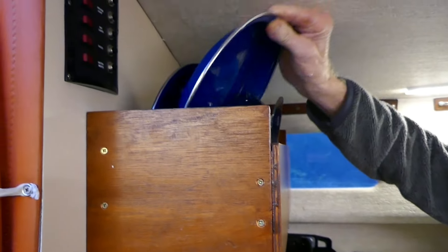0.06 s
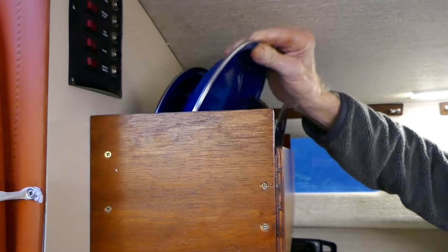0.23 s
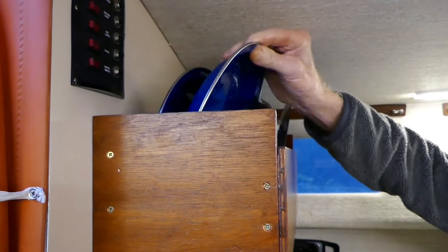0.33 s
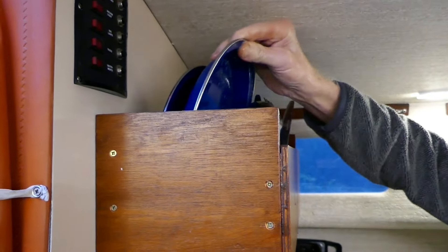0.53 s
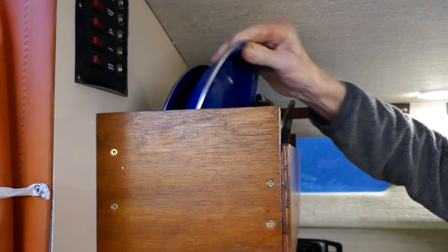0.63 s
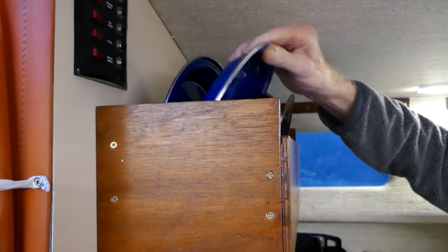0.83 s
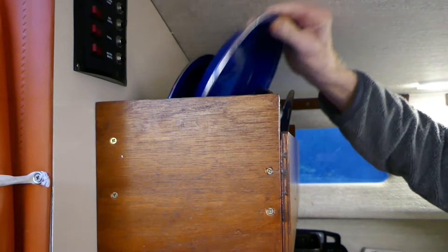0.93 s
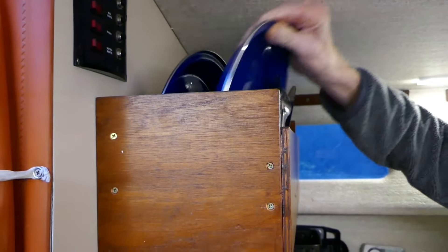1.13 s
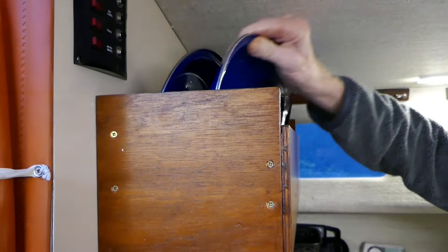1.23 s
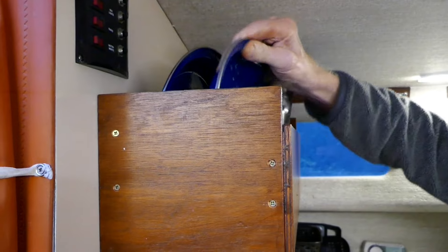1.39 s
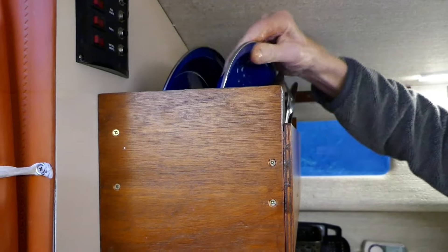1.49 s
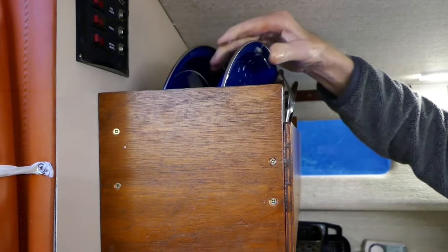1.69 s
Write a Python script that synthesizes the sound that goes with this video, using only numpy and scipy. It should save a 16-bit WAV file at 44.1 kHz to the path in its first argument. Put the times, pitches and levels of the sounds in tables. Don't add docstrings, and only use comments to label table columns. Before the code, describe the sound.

Enamel plates clatter into a wooden rack in a small boat cabin, heard close in stereo. Soft hush and a faint plate hum open; at 0.2 s rims clink and wood knocks. Lighter taps and rubs come around 0.5 and 0.8 s. A hard shove at 0.95 s rings brightly, then rattling continues with tiny cutlery tinkles at 1.1-1.3 s, final clinks near 1.5 s, settling by 1.7 s.

```python
import sys
import numpy as np
from scipy import signal
from scipy.io import wavfile

SR = 44100
rng = np.random.default_rng(int(sys.argv[2]) if len(sys.argv) > 2 else 0)


def gain_from_decibels(decibels):
    exponent = np.asarray(decibels, float) / 20
    return 10 ** exponent


def wav_out(sig):
    wavfile.write(sys.argv[1], SR, np.round(np.clip(np.atleast_2d(sig).T, -1, 1) * 32767).astype(np.int16))


N = 77175
TIME_S = np.arange(N) / SR
LEFT_RIGHT = np.array([[1], [-1]])


def rms_one(x):
    return x / np.sqrt(np.mean(x ** 2) + 1e-20)


def at_hz(points, hz):
    table_hz, values = np.transpose(points)
    return np.interp(np.log(hz), np.log(table_hz), values)


def cut(x, hz, kind):
    return signal.sosfilt(signal.butter(2, hz, kind, fs=SR, output="sos"), x)


def ring(clicks, hz, t60_s):
    decay = gain_from_decibels(-60 / (max(t60_s, 0.004) * SR))
    turn = 2 * np.pi * hz / SR
    return signal.lfilter([0, np.sin(turn)], [1, -2 * decay * np.cos(turn), decay ** 2], clicks + 1e-18)


def train(start_s, gains):
    clicks = np.zeros(N)
    clicks[(np.asarray(start_s) * SR).astype(int)] = gains
    return clicks


def grains(per_s, spread_db):
    chance, sign, size = rng.random((3, N))
    height = gain_from_decibels(spread_db * np.minimum(-np.log(size), 4))
    return rms_one((chance < per_s / SR) * np.sign(sign - 0.5) * height)


def burst(clicks, length_s):
    n = np.arange(int(0.008 * SR))
    shape = rng.standard_normal(len(n)) * np.exp(-n / (length_s * SR))
    return signal.lfilter(shape / np.linalg.norm(shape), [1], clicks)


def swells(rows):
    edge_power = 1.7
    gains = []
    for peak_s, rise_s, fall_s, level_db, *_ in rows:
        edge_s = np.where(TIME_S < peak_s, rise_s, fall_s)
        gains.append(gain_from_decibels(level_db) * np.exp(-np.abs((TIME_S - peak_s) / edge_s) ** edge_power))
    return np.array(gains)


def total_db(gains):
    return 20 * np.log10(gains.sum(axis=0) + 1e-9)


def body(modes, touches, hits_s, hits_db):
    out = 0
    for hz, db, t60_s in modes:
        small = touches * rng.standard_normal(N) / np.sqrt(t60_s * SR / 28 * len(modes))
        scatter_db = 3.5 * rng.standard_normal(len(hits_s))
        big = train(hits_s, gain_from_decibels(hits_db + scatter_db))
        out = out + gain_from_decibels(db) * ring(small + big, hz, t60_s)
    return out


# pitch_hz, level_db (per Hz)
HUSH_SPECTRUM = [(15, -63), (25, -12), (242, 1), (911, -6.5), (1070, -21), (1260, -5), (4030, -30),
                 (10100, -35), (16000, -30)]
# pitch_hz, likeness (0 to 1)
HUSH_LIKENESS = [(30, 0.99), (120, 0.87), (2000, 0.3), (8000, 0.2)]


def hush():
    out = 0
    white = rng.standard_normal((2, 2, N))
    edges = 22 * 2 ** np.arange(0, 9.6, 0.5)
    for k, (low, high) in enumerate(zip(edges, edges[1:])):
        mid, side = cut(white[k % 2], [low, high], "band")
        hz = np.sqrt(low * high)
        alike = at_hz(HUSH_LIKENESS, hz)
        stereo = np.sqrt(1 + alike) * mid + np.sqrt(1 - alike) * side * LEFT_RIGHT
        out = out + gain_from_decibels(at_hz(HUSH_SPECTRUM, hz)) * stereo
    return gain_from_decibels(-51.5) * rms_one(out)


# time_s, pitch_hz, level_db
CARRIED_SONG = [
    (0.0, 1035, -63),
    (0.07, 1055, -55.5),
    (0.11, 1068, -58),
    (0.15, 1087, -52),
    (0.18, 1073, -53.5),
    (0.21, 1040, -68),
]


def carried_plate():
    time_s, pitch_hz, level_db = np.transpose(CARRIED_SONG)
    phase = 2 * np.pi * np.cumsum(np.interp(TIME_S, time_s, pitch_hz)) / SR
    level = np.sqrt(2) * gain_from_decibels(np.interp(TIME_S, time_s, level_db))
    return level * np.sin(phase) * np.exp(-np.maximum(TIME_S - 0.21, 0) / 0.063)


# start_s, peak_db, pitch_hz (strongest), brightness_db (relative)
RIM_CLINKS = [(0.199, -9, 2365, -16), (0.2035, -14.5, 2440, -26), (0.2111, -11, 1960, -8),
              (0.2214, -11, 2500, -15), (0.2112, -14.5, 4360, -26), (0.2242, -15, 4480, -17),
              (0.242, -21, 2460, -22), (0.2553, -18, 2550, -15), (0.2634, -31, 2430, -19),
              (0.276, -23, 2550, -13), (0.2906, -23.5, 2480, -22), (0.3012, -27.5, 1700, -23),
              (0.439, -29, 1570, -31), (0.4674, -19, 2194, -29), (0.4713, -16.5, 2225, -27),
              (0.501, -11.5, 3507, -18), (0.501, -16, 1684, -25), (0.5035, -15.5, 2140, -15),
              (0.618, -32, 2150, -33), (0.6466, -45, 1940, 4.5), (0.6896, -33, 2540, -30),
              (0.7666, -32, 2210, -27), (0.7781, -31, 2470, -15), (0.7938, -26, 2400, -39),
              (0.7991, -20.5, 2160, -22), (0.807, -17, 2460, -43), (0.8807, -21.5, 2395, -49),
              (0.9265, -23, 4700, -7), (0.9432, -14.5, 4670, -13), (0.952, -11, 4686, -11),
              (0.9626, -10, 2640, -14.5), (0.9817, -10, 3406, -13), (1.112, -8, 2345, -12.5),
              (1.1405, -18, 2350, -8), (1.1801, -19.5, 1930, -36), (1.1893, -20, 4180, -15),
              (1.2244, -9.5, 2660, -19.5), (1.2307, -17, 2190, -33), (1.2444, -13, 2490, -27),
              (1.2515, -14.5, 2360, -25), (1.2764, -18, 4410, -12), (1.2982, -16, 3500, -8.5),
              (1.3034, -19.5, 2480, -15), (1.4504, -27.5, 2570, -19), (1.4607, -11, 1550, -21.5),
              (1.468, -17, 2160, -39), (1.515, -13, 5195, -7.5), (1.5194, -9, 2500, -24),
              (1.531, -11, 2370, -25), (1.548, -17.5, 2550, -17), (1.5759, -19, 2075, -32),
              (1.6479, -37.5, 1630, -32), (1.727, -35, 2470, -54)]
# peak_s, rise_s, fall_s, level_db, brightness_db (relative)
RIM_SLIDES = [(0.204, 0.0049, 0.08, -22.5, -17.5), (0.301, 0.04, 0.0054, -33.5, -17.5),
              (0.469, 0.0092, 0.034, -25, -38), (0.5, 0.0024, 0.027, -22, -18),
              (0.619, 0.071, 0.034, -38, -40), (0.701, 0.033, 0.034, -39.5, -22),
              (0.808, 0.029, 0.028, -26, -31.5), (.885, 0.022, 0.022, -42, -20),
              (0.954, 0.025, 0.036, -21, -19.5), (1.02, 0.03, 0.099, -38.5, -29),
              (1.121, 0.015, 0.1, -24.5, -20.5), (1.235, 0.0046, 0.081, -24, -24.5),
              (1.464, 0.024, 0.057, -26, -31), (1.524, 0.0054, 0.039, -24.5, -21.5),
              (1.59, 0.018, 0.014, -33, -18), (1.73, 0.0041, 0.042, -53, -43)]
# pitch_hz, level_db
GRIPPED_PLATE = [(1150, -8.5), (1600, -9.5), (2300, 3), (2900, -8), (4800, -6.5), (6300, -19), (10000, -16),
                 (15500, -27)]


def plate():
    start_s, peak_db, lead_hz, hard_db = np.transpose(RIM_CLINKS)
    slides = swells(RIM_SLIDES) + 1e-9
    slide_bright_db = np.array(RIM_SLIDES)[:, 4] @ slides / slides.sum(axis=0)
    mean_bright_db = -20.5
    chatter_db = total_db(slides) - 4
    chatter_tilt_db, clink_tilt_db = slide_bright_db - mean_bright_db, hard_db - mean_bright_db
    touches = grains(per_s=2600, spread_db=2.6)

    out = np.zeros((2, N))
    for hz in np.geomspace(1150, 15900, num=70) * rng.uniform(0.97, 1.015, size=70):
        tilt = np.clip(np.log2(hz / 2600) / 2, 0, 1)
        t60_s = 0.98 * 0.042 * (hz / 2000) ** -0.13
        small = touches * rng.standard_normal(N) * gain_from_decibels(chatter_db + tilt * chatter_tilt_db) / np.sqrt(t60_s * SR)
        scatter_db = 4.47 * rng.standard_normal(len(start_s))
        big = train(start_s, gain_from_decibels(peak_db - 20 + tilt * clink_tilt_db + scatter_db))
        mode_db = at_hz(GRIPPED_PLATE, hz)
        mode = gain_from_decibels(mode_db) * ring(small + burst(big, 0.00066), hz, t60_s)
        shimmer_db = mode_db - 20 + 2.5 * rng.standard_normal() - 17 * tilt ** 2
        mode += gain_from_decibels(shimmer_db) * ring(small + big, hz * 1.007, 0.25)
        out += mode * (1 + (0.051 + 0.61 * tilt) * rng.standard_normal() * LEFT_RIGHT)

    crack = burst(train(start_s, gain_from_decibels(peak_db - 11.5 + 0.35 * clink_tilt_db)), 0.0015)
    out += cut(crack, [900, 15500], "band")
    for s, db, hz in zip(start_s, peak_db, lead_hz):
        out += ring(train([s], gain_from_decibels(db - 6)), hz, 0.033)
    return out


# start_s, peak_db, pitch_hz (strongest), t60_s
RACK_KNOCKS = [(0.201, -12.5, 318, 0.025), (0.2041, -7, 510, 0.038), (0.209, -11, 721, 0.057),
               (0.435, -32.5, 353, 0.08), (0.309, -25.5, 477, 0.074), (0.469, -20, 361.7, 0.23),
               (0.481, -15.5, 902, 0.076), (0.607, -27, 363, 0.14), (0.612, -28.5, 865, 0.14),
               (0.693, -34, 660, 0.061), (0.781, -26.5, 505, 0.05), (0.803, -18.5, 353.5, 0.22),
               (0.811, -16.5, 875.7, 0.18), (0.943, -16.5, 466, 0.081), (0.952, -10, 938, 0.052),
               (0.965, -21, 990, 0.074), (1.109, -17.5, 581, 0.028), (1.233, -21, 490, 0.021),
               (1.256, -11.5, 470, 0.019), (1.276, -19, 254, 0.015), (1.322, -31, 524, 0.028),
               (1.42, -33, 590, 0.097), (1.433, -24, 574, 0.06), (1.451, -18.5, 407, 0.095),
               (1.468, -23, 990, 0.024), (1.479, -23, 261, 0.16), (1.534, -17.5, 664, 0.06),
               (1.54, -21.5, 201.8, 0.15), (1.552, -21, 790, 0.029), (1.584, -22.5, 343, 0.036),
               (1.609, -24.5, 336, 0.08)]
# peak_s, rise_s, fall_s, level_db
RACK_RUBS = [
    (.207, 0.0028, 0.048, -25),
    (.31, 0.028, 0.055, -35),
    (.475, 0.017, 0.071, -29.5),
    (.62, 0.036, 0.094, -39),
    (.815, 0.04, 0.075, -28.5),
    (.955, 0.024, 0.039, -22.5),
    (1.12, 0.078, 0.11, -30),
    (1.26, 0.039, 0.081, -26),
    (1.47, 0.028, 0.038, -23.5),
    (1.55, 0.018, 0.065, -30.5),
]
# pitch_hz, level_db, t60_s
RACK_WOOD = [(159, -5.5, 0.023), (196.4, -8.5, 0.048), (269.7, -4.5, 0.084), (378.5, -2.5, 0.054),
             (528, 0.5, 0.025), (657, -1.5, 0.054), (884.5, -3, 0.027), (1024, -4, 0.037)]


def rack():
    start_s, peak_db, pitch_hz, t60_s = np.transpose(RACK_KNOCKS)
    touches = grains(per_s=900, spread_db=2.5) * gain_from_decibels(total_db(swells(RACK_RUBS)) + 0.5)
    out = body(RACK_WOOD, touches, start_s, peak_db - 21)
    for s, db, hz, t60 in zip(start_s, peak_db, pitch_hz, t60_s):
        out += ring(train([s], gain_from_decibels(db - 3.5)), hz, t60)
    return cut(cut(out, 1320, "low"), 3500, "low")


# pitch_hz, level_db, t60_s
FIRST_PLATE = [(1109, -4, 1.5), (1340, 3, 2), (2490, 18, .17), (3440, 12, .2), (1653, 0, 2), (1809, 1, .6),
               (1992, -4, .9), (2326, -1, .45), (2632, -10, 1), (4440, 12, .13), (3257, 0, .8),
               (3709, 4, .5), (4592, 1, .5), (5233, 7, .38)]
SECOND_PLATE = [(1443, -4, .3), (1330, -1, .3), (1655, 5, .8), (1820, -1, .35), (4100, -8, .25),
                (2116, -6, .25), (3063, -14, .8), (3575, -7, .25)]
THIRD_PLATE = [(1345, -26, 1.5), (1690, -20, .35), (2190, 1, .06), (2121, -19, .4), (2562, -17, .36),
               (2789, -19, .3), (3666, -28, 1.5), (4000, -22, .4), (4550, -27, .5), (4969, -29, 1),
               (3278, -22, .8), (3391, 0, .14), (3849, -15, .2), (5109, -22, .16)]
FOURTH_PLATE = [(1365, -2, 1.2), (1835, -4, .5), (2352, -5, .6)]
# start_s, gripped_s, level_db
FREE_RINGS = [
    (0.214, 0.49, -40),
    (.53, 0.725, -38.5),
    (0.985, 1.116, -17),
    (1.107, 1.46, -34),
]


def free_plates():
    out = 0
    plates = (FIRST_PLATE, SECOND_PLATE, THIRD_PLATE, FOURTH_PLATE)
    for modes, (start_s, gripped_s, level_db) in zip(plates, FREE_RINGS):
        rings = sum(ring(train([start_s], gain_from_decibels(level_db + db)), hz, t60_s) for hz, db, t60_s in modes)
        out = out + rings * np.exp(-np.maximum(TIME_S - gripped_s, 0) / 0.021)
    return out


# start_s, level_db
CUTLERY_TINKLES = [
    (1.092, -52),
    (1.114, -30),
    (1.244, -27.5),
    (1.296, -48),
]
# pitch_hz, level_db, t60_s
CUTLERY_MODES = [(8250, -6, .06), (9650, -3, .07), (11050, -7, .09), (12800, -12, .06), (14070, -5, .06),
                 (15300, -8, .06)]


def cutlery():
    start_s, level_db = np.transpose(CUTLERY_TINKLES)
    return body(CUTLERY_MODES, 0, start_s, level_db) * gain_from_decibels([[-1.5], [1.5]])


def cabin(x):
    t60_s, wall_cut_hz = 0.094, 2900
    out = np.zeros((2, N))
    dull = np.exp(-2 * np.pi * wall_cut_hz / SR)
    lags = (rng.uniform(0.006, 0.022, 16) * SR).astype(int)
    for k, lag in enumerate(lags):
        loop, state = x.copy(), [0.]
        gain = gain_from_decibels(-60 * lag / SR / t60_s)
        for i in range(lag, N, lag):
            back, state = signal.lfilter([gain * (1 - dull)], [1, -dull], loop[i - lag:i], zi=state)
            loop[i:i + lag] += back[:N - i]
        out[k % 2] += (loop - x) * (-1) ** (k // 2)
    return out


def scene():
    background = hush()
    dry = carried_plate() + plate() + rack() + free_plates() + cutlery()
    room = cabin(dry.mean(axis=0))
    wet = gain_from_decibels(-10.5) * room.mean(axis=0) + gain_from_decibels(-21) * (room[0] - room[1]) * LEFT_RIGHT
    return cut(cut(dry + wet, 144, "high"), 98, "high") + background


def band_limit(x):
    return signal.sosfilt(signal.butter(12, 16800, fs=SR, output="sos"), x)


def record(dry):
    mix = signal.sosfilt(signal.cheby2(10, 50, 16950, fs=SR, output="sos"), dry)
    return band_limit(mix)


dry = scene()
out = record(dry)
wav_out(out)
```